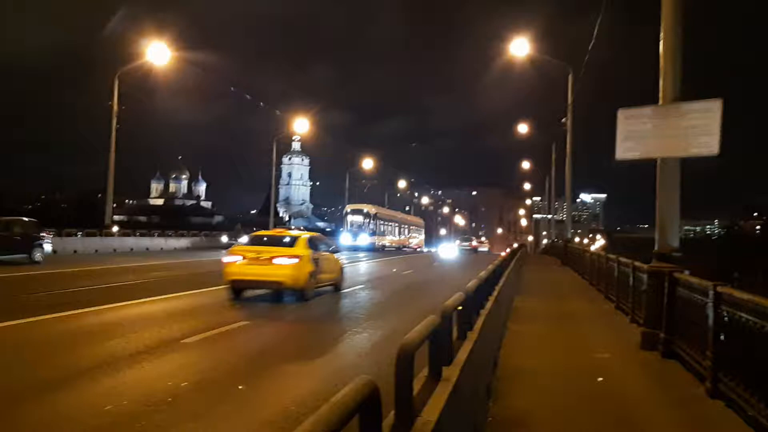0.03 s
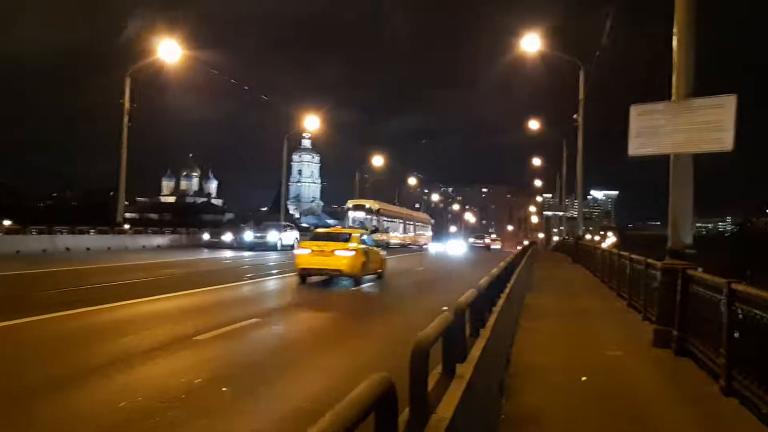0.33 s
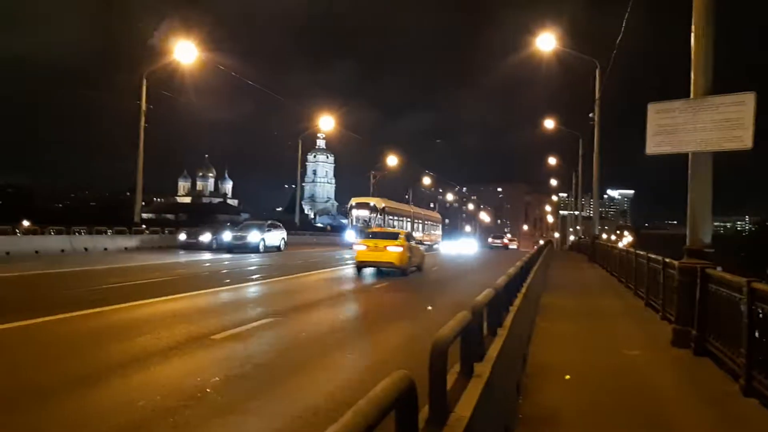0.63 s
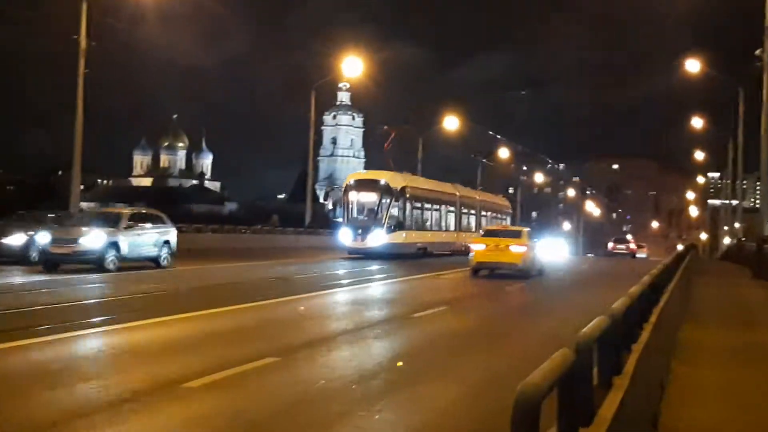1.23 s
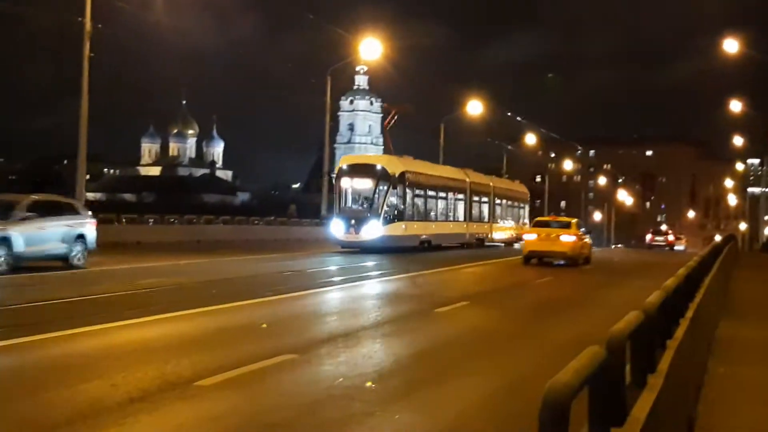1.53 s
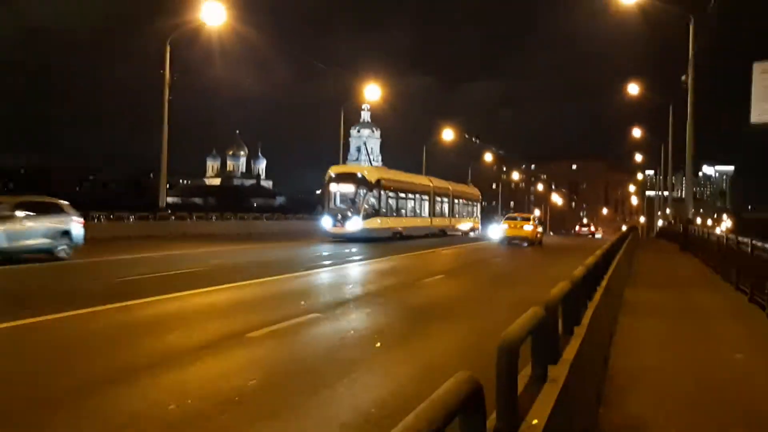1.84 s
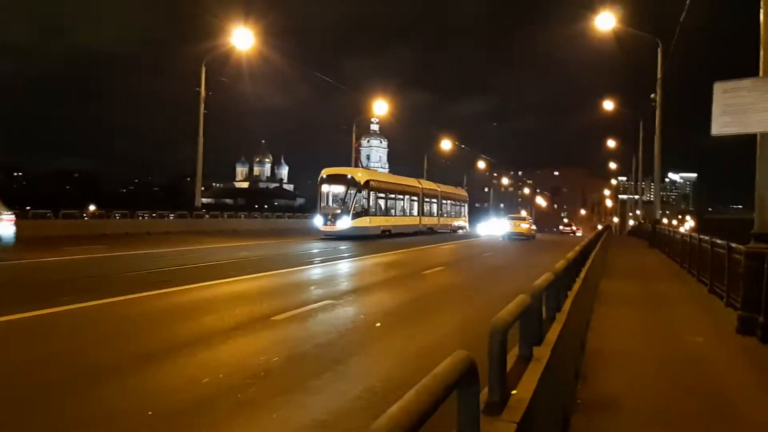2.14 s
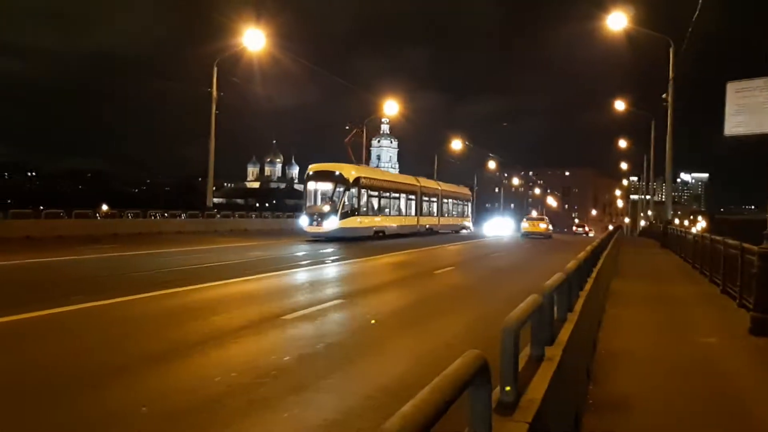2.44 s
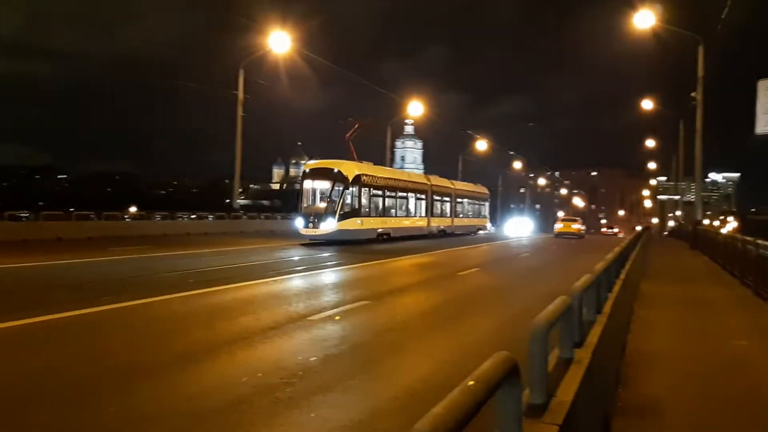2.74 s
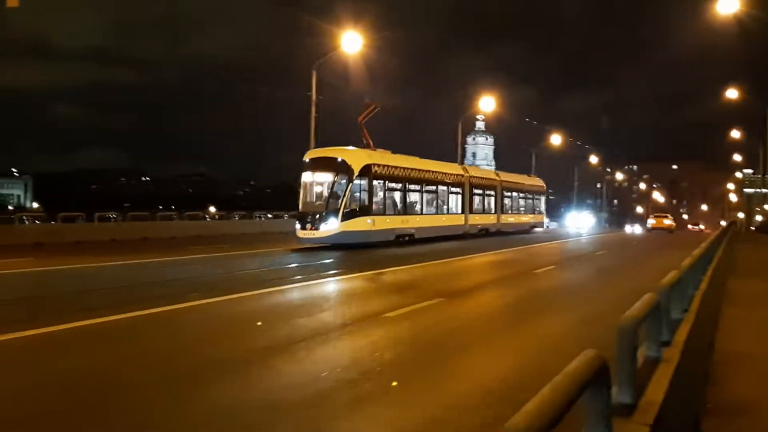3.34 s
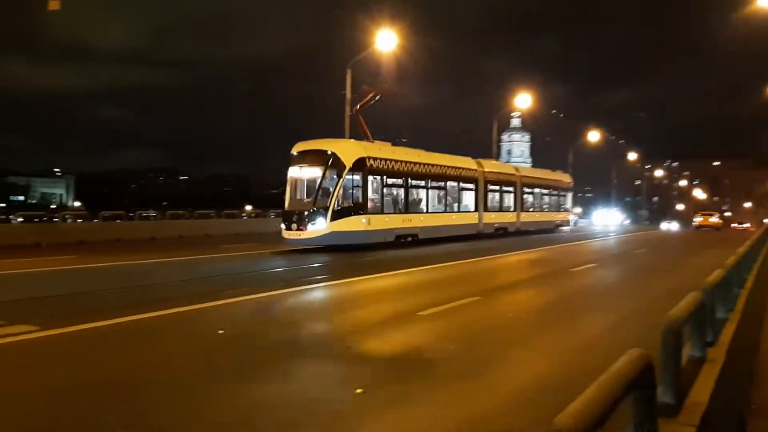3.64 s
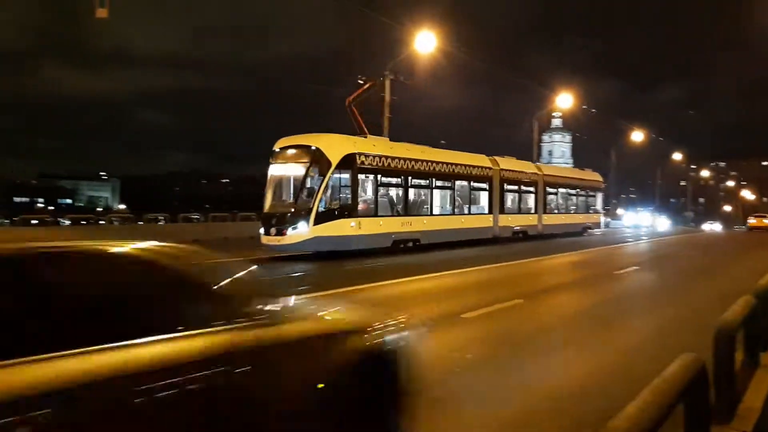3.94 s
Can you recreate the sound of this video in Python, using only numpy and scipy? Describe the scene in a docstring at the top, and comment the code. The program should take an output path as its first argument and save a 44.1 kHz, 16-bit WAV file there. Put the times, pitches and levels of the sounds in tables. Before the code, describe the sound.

A car approaches and passes close by, its tyres hissing, roaring and thumping twice over a road joint. Earlier, other cars pass over distant traffic and a faint tram hum, heard by phone from a bridge footway.

```python
"""A car overtakes close by on a city bridge at night, its tyres roaring and thumping over a road joint.
Tyres hiss ahead of the car, roar behind it and spray sand. Before it arrives, a taxi draws away and
another car passes on the far side. Under them lie the hum of an approaching tram, ticks of grit and
the wash and rumble of distant traffic. It is all heard from the footway by a phone's two microphones."""
import sys
import numpy as np
from scipy import signal
from scipy.fft import rfft, irfft
from scipy.io import wavfile
from scipy.ndimage import uniform_filter1d, map_coordinates

SR = 44100
rng = np.random.default_rng(int(sys.argv[2]) if len(sys.argv) > 2 else 0)


def master(y):
    """Save y as 16-bit WAV."""
    cut = np.clip(np.atleast_2d(y).T, -1, 1)
    pcm = np.round(cut * 32767)  # scale
    wavfile.write(sys.argv[1], SR, pcm.astype(np.int16))


N = 176400
T, HZ = np.arange(N) / SR, np.arange(N // 2 + 1) * SR / N + 1e-3
MIC_DELAY_S = 0.000509  # travel time between the microphones; a "lag" is a share of this
FALLOFF, HISS_FALLOFF = 0.97, 0.81  # at 1, twice the distance would halve the sound

# How each car drives past: closest_at_s, speed_m_per_s (negative is oncoming), distance_m
NEAR_DRIVE = (3.772, 20, 5.3)
FAR_DRIVE = (1.66, -13.5, 14.2)
TAXI_DRIVE = (-1.4, 17, 5)
# Where the phone points: time_s, left_of_road_ahead_deg
PHONE_HEADING = [(0, 3.7), (1.5, 10.8), (2, 25), (2.45, 25.3), (2.6, 37), (3.05, 40), (4, 43.6)]
# The tone of each noise, from bass to treble: pitch_hz, level_db
ROAR_TONE = [(40, -40), (110, -13.5), (250, 0.5), (520, -0.5), (1000, 1), (1450, -6), (2100, -12.5),
             (3100, -13), (4200, -10.5), (5100, -19), (6300, -17), (7800, -37), (10300, -27), (13000, -37),
             (15500, -40)]  # tyre noise sent all round
HISS_TONE = [(150, -14.5), (330, 1.5), (600, -3), (1000, -2), (1500, 0), (2100, -6), (3000, -5),
             (4400, -10), (5100, -13.5), (6400, -15.5), (7800, -28), (10500, -44), (15500, -42)]  # tyre noise thrown forward
WAKE_TONE = [(150, -27), (400, -19), (750, 7), (1080, 7.5), (1400, -6.5), (2500, 0.5), (6000, -10),
             (9000, -36)]  # tyre noise thrown back
FAR_TONE = [(120, -14.5), (290, 1), (450, -5), (700, -3), (1020, 2), (1500, -15), (2400, -12), (3300, -15),
            (4500, -8.5), (5300, -24), (6500, -20), (8000, -33), (15000, -44)]
GRIT_TONE = [(2500, -18), (5000, 2), (7500, 3.5), (9500, 6), (12000, 0.5), (14500, 3), (16000, -10)]
WASH_TONE = [(25, -32), (55, -20), (90, -18.5), (130, -7), (230, 1), (400, -8), (900, -4.5), (1400, -7.5),
             (2400, -13.5), (3300, -15.5), (4300, -19), (5100, -20), (6400, -19.5), (7900, -35.5),
             (10500, -41), (12500, -41), (15500, -39)]
RUMBLE_TONE = [(25, -51), (60, -16), (110, -0.5), (150, 0.5), (200, -2.5), (320, -37.5)]
SIZZLE_TONE = [(4000, -22), (6500, -39), (8200, 0.5), (10300, 5.5), (13000, -4), (15500, -2.5)]
# Wheels hitting road joints: start_s, level_db, lag_share, treble_tilt_db_per_octave, length_factor
JOINT_HITS = [(0.583, -21, 1, -3, 0.48), (0.599, -27, 0.8, -2, .6), (1.295, -31.5, 0.3, -6, 1),
              (1.395, -23, 0.52, 0.5, 1.1), (1.472, -28, 0.28, 9, 0.83), (1.57, -26.5, 0.66, 3, 1.4),
              (2.881, -26, 0.61, -0.5, 0.78), (2.735, -31, .6, -5, 0.67), (3.07, -21.5, 0.87, 0, 0.91),
              (3.294, -23, 0.85, 3, 0.9), (3.769, -13, 0.51, -0.5, 0.93), (3.957, -13, 0.25, -0.5, 0.67)]
# The notes a struck tyre rings with: pitch_hz, width_hz, level_db, rise_s
TYRE_NOTES = [(188, 36, -10.5, 0.037), (322, 71, -15, 0.029), (494, 100, 0, .017), (692, 63, -3, 0.015),
              (1040, 83, 1, 0.0037)]
# Short swells of tyre hiss: start_s, rise_s, pitch_hz, width_hz, level_db, lag_share
HISS_SWELLS = [(2.06, 0.039, 6500, 460, -35, -.6), (2.68, .13, 4200, 900, -35, .7),
               (2.63, 0.2, 2950, 200, -42, 0.8), (3.797, 0.019, 3600, 840, -19.5, 0.6),
               (3.3, .016, 5800, 900, -31, 0.6), (3.952, 0.01, 6000, 900, -28, .1)]
# Grit flicked by tyres: start_s, level_db
GRIT_TICKS = [(.589, -34), (.85, -35), (1.288, -32), (1.533, -34), (1.67, -35), (1.899, -26), (2.039, -31),
              (2.761, -28.5)]
# The notes of the tram's hum: pitch_hz, width_hz, level_db
TRAM_NOTES = [(222.6, 12.7, -34), (280, 41, -33), (671.7, 11, -40), (4110, 20, -63)]
# How the background rises and falls: time_s, level_db
WASH_LEVELS = [(.1, -23.5), (.5, -26.5), (.9, -26), (1.4, -24), (2, -25.5), (2.5, -26.5), (3, -28),
               (4, -25)]
RUMBLE_LEVELS = [(.1, -29), (.3, -34.5), (.49, -30.5), (.56, -42), (1.1, -40.5), (1.5, -36), (2.4, -34.5),
                 (2.9, -35), (3.6, -34), (4, -38.5)]
SIZZLE_LEVELS = [(.1, -53), (.6, -48.5), (1.12, -49), (1.3, -41), (1.65, -46.5), (1.8, -51), (2.1, -49),
                 (2.3, -67), (2.55, -56), (2.68, -42), (3.1, -55), (3.7, -40.5), (4, -53)]


def near_car(wheelbase_m=2.7, rear_db=-6, scatter_db=-4.5, sand_db=-37):
    """Two axles, heard directly and bounced off road and railings, spray sand as they pass."""
    front = moving_stereo(*axle(wheelbase_m / 2))
    rear = undb(rear_db) * moving_stereo(*axle(-wheelbase_m / 2))
    nearness, _, _ = drive(NEAR_DRIVE)
    spray = undb(sand_db) * nearness ** 1.1 * sand()
    scattered = undb(scatter_db) * all_round(lambda: axle(0)[0])
    return front + rear + scattered + spray


def axle(offset_m, roar_db=-19.5, wake_db=-20, hiss_db=-18, shake_db=0.7):
    """One axle's sound and lag: its tyres hiss forward, roar backward and are shaken by the road."""
    nearness, going_away, lag = drive(NEAR_DRIVE, offset_m)
    behind = (1 + np.tanh(4 * (going_away - 0.061))) / 2  # 0 as it comes, 1 once it has passed
    roar = undb(roar_db) * noise(ROAR_TONE) + undb(wake_db) * behind * noise(WAKE_TONE)
    hiss = undb(hiss_db) * (1 - behind) * noise(HISS_TONE)
    shake = undb(shake_db * wobble(90))
    return (roar * nearness ** FALLOFF + hiss * nearness ** HISS_FALLOFF) * shake, lag


def sand(grains_per_s=1200, size_spread_db=4):
    """Sand crackles under the tyres: random tiny grains, some much larger than others."""
    size = undb(size_spread_db * np.minimum(rng.exponential(size=N), 4))
    hits = rng.random(N) < grains_per_s / SR
    grains = np.sqrt(abs(uniform_filter1d(hits * size ** 2, size=40)))  # each lasts about 1 ms
    return all_round(lambda: noise(GRIT_TONE)) * grains / np.sqrt(np.mean(grains ** 2))


def joint_thumps():
    """A wheel slaps a joint: the high notes come first, the air inside the tyre booms last."""
    out = np.zeros((2, N))
    for hz, width, note_db, rise in TYRE_NOTES:
        note, octaves = ring(hz, width), np.log2(hz / 500)
        for start, db, lag, tilt_db, length in JOINT_HITS:
            gain = undb(db + note_db + tilt_db * octaves)
            add_burst(out, still_stereo(gain * note, lag), start, rise * length)
    return out


def hiss_swells():
    """Tyres hiss briefly, most brightly just after the near car's wheels hit the joint."""
    out = np.zeros((2, N))
    for start, rise, hz, width, db, lag in HISS_SWELLS:
        add_burst(out, still_stereo(undb(db) * ring(hz, width), lag), start, rise)
    return out


def far_car(level_db=-28, ahead_db=3, rough_db=1.6):
    """The tyres of an oncoming car roar beyond the tram tracks, louder ahead of it than behind."""
    nearness, going_away, lag = drive(FAR_DRIVE)
    roar = noise(FAR_TONE) * nearness ** FALLOFF
    gain = undb(level_db - ahead_db * going_away + rough_db * wobble(29))
    return moving_stereo(roar * gain, lag)


def taxi(level_db=-19):
    """A taxi that has just passed throws its tyre noise back as it draws away."""
    nearness, _, lag = drive(TAXI_DRIVE)
    return moving_stereo(noise(WAKE_TONE) * nearness ** FALLOFF * undb(level_db), lag)


def grit():
    """Tyres flick bits of grit, making tiny bright ticks."""
    out, tick = np.zeros((2, N)), still_stereo(noise(GRIT_TONE), lag=0)
    for start, db in GRIT_TICKS:
        add_burst(out, undb(db) * tick, start, rise_s=0.001)
    return out


def tram(growth_db_per_s=1):
    """A wavering hum and a thin whine grow louder as the tram nears."""
    hum = sum(undb(db) * ring(hz, width) for hz, width, db in TRAM_NOTES)
    return still_stereo(hum * undb(growth_db_per_s * (T - 3.5)), lag=0.31)


def background(flicker_db=1.5, throb_db=2.3, sparkle_db=3.3):
    """A faint, high sizzle swells and fades over the traffic's wash and rumble."""
    wash = all_round(lambda: noise(WASH_TONE), spacing=0.97)
    wash *= undb(curve(WASH_LEVELS) + flicker_db * wobble(30))
    rumble = all_round(lambda: noise(RUMBLE_TONE))
    rumble *= undb(curve(RUMBLE_LEVELS) + throb_db * wobble(6.7))
    sizzle = all_round(lambda: noise(SIZZLE_TONE))
    sizzle *= undb(curve(SIZZLE_LEVELS) + sparkle_db * wobble(120))
    return wash + rumble + sizzle


def shimmer(sound, count=20, depth_db=1.2):
    """The tone shifts slightly: narrow bands of pitch swell and fade on their own."""
    place = np.interp(np.log(HZ), np.log([100, 14000]), [0, count - 1])
    spectrum = rfft(sound)
    bands = (irfft(spectrum * np.maximum(1 - abs(place - k), 0), N) for k in range(count))
    return sum(band * undb(depth_db * wobble(8)) for band in bands)


def drive(path, offset_m=0):
    """A passing car's nearness (1 at its closest), direction (-1 coming, 1 going) and lag."""
    closest_at, speed, distance = path
    along = speed * (T - closest_at) + offset_m  # the offset is from the car's middle
    reach = np.hypot(along, distance)
    bearing = np.arctan2(distance, along) - np.radians(curve(PHONE_HEADING))
    return distance / reach, np.sign(speed) * along / reach, np.sin(bearing)


def moving_stereo(sound, lag):
    """A moving source at both microphones: sound from the left reaches the right one later."""
    times = [T + side * lag * MIC_DELAY_S / 2 for side in (1, -1)]
    return np.array([map_coordinates(sound, [t * SR], order=3, mode="mirror") for t in times])


def still_stereo(sound, lag):
    """A still source at both microphones."""
    return np.array([sound, np.roll(sound, int(lag * MIC_DELAY_S * SR))])


def all_round(source, spacing=0.84, likeness=0.93):
    """Sound from every side: alike at both microphones in the bass, unrelated in the treble."""
    alike = likeness * np.sinc(2 * HZ * MIC_DELAY_S * spacing)
    gains = [np.sqrt(np.clip(1 + sign * alike, 0, 2) / 2) for sign in (1, -1)]
    mid, side = (irfft(rfft(source()) * gain, N) for gain in gains)
    return np.array([mid + side, mid - side])


def add_burst(out, sound, start_s, rise_s):
    """Add a burst that swells to the level of the given sound, then dies away."""
    span = slice(int(start_s * SR), int((start_s + 7 * rise_s) * SR))
    age = (T[span] - start_s) / rise_s
    swell = (age * np.exp(1 - age)) ** 2
    burst = sound[:, span] * swell
    gain = sound[0, ::50].std() * np.sqrt(np.mean(swell ** 2) / np.mean(burst ** 2))
    out[:, span] += burst * gain


def noise(tone):
    """Noise that follows a tone table, with the deepest bass faded out."""
    hz, db = np.array(tone, float).T
    gain = undb(np.interp(np.log(HZ), np.log(hz), db))
    return shaped_noise(gain * HZ / np.hypot(HZ, 20))


def ring(hz, width):
    """A wavering note: noise kept close to one pitch."""
    off_pitch = (HZ - hz * hz / HZ) / (2 * width)
    return shaped_noise(1 / (1 + off_pitch ** 2))


def shaped_noise(gain):
    """Noise shaped by a gain at each pitch, then scaled to a typical size of 1."""
    sound = irfft(rfft(rng.standard_normal(N)) * gain, N)
    return sound / sound.std()


def wobble(rate_hz):
    """A random drift of typical size 1, swinging about rate_hz times a second."""
    return 1.2 * np.interp(T * rate_hz * 2, np.arange(4096), rng.standard_normal(4096))


def curve(rows):
    """Straight lines through (time_s, value) rows."""
    times, values = np.array(rows, float).T
    return np.interp(T, times, values)


def undb(db):
    """Turn decibels into a gain to multiply by."""
    return 10 ** (np.asarray(db) / 20)


def scene():
    """Everything on the bridge, added together."""
    road = shimmer(near_car() + far_car() + taxi() + background())
    return road + tram() + joint_thumps() + grit() + hiss_swells()


def record(dry, start_s=0.1036, fade_in_s=0.0036, top_hz=15950):
    """The phone starts abruptly and cuts off the highest treble."""
    fade_in = np.clip((T - start_s) / fade_in_s, 0, 1)
    treble_cut = signal.ellip(10, .1, 80, top_hz, fs=SR, output="sos")
    return signal.sosfilt(treble_cut, dry * fade_in)


dry = scene()
out = record(dry)
master(out)
```